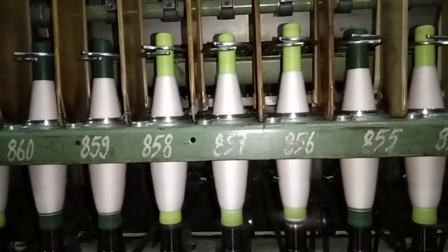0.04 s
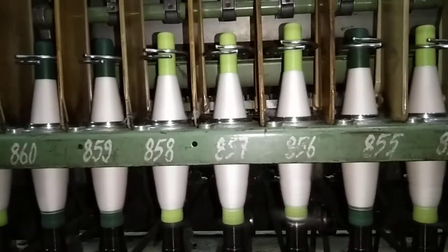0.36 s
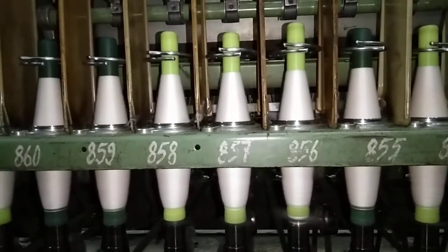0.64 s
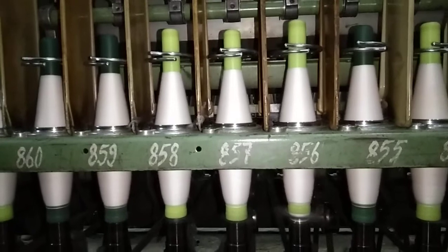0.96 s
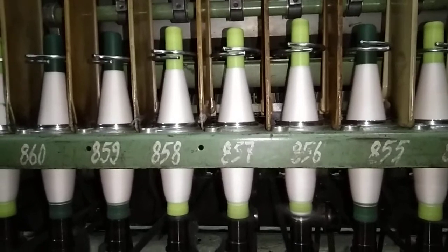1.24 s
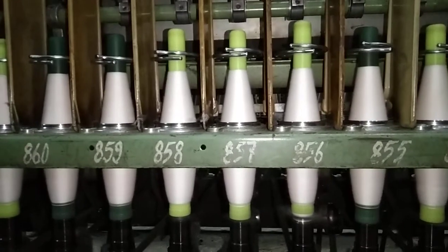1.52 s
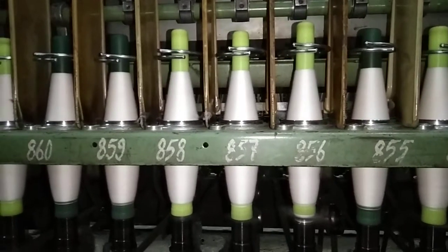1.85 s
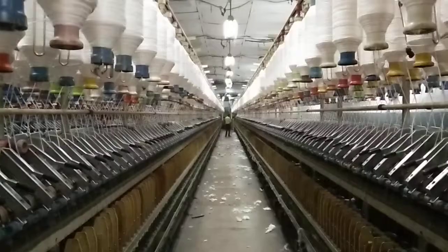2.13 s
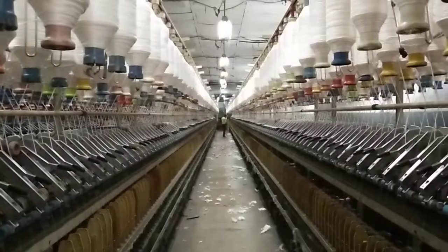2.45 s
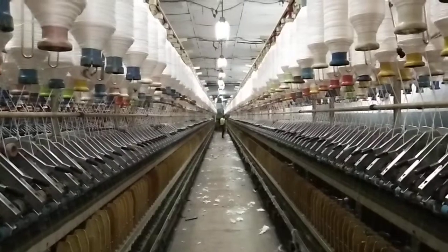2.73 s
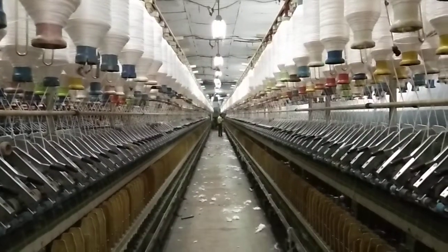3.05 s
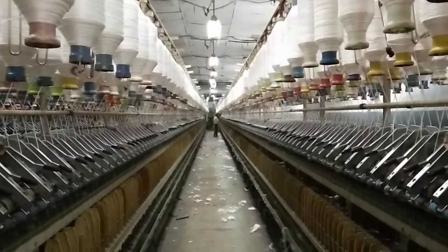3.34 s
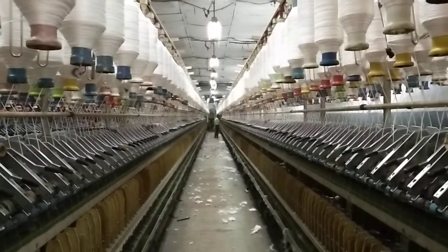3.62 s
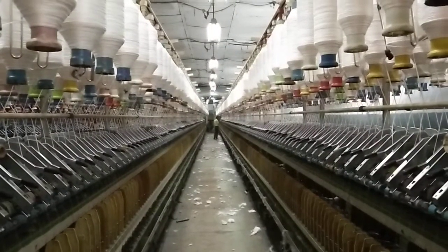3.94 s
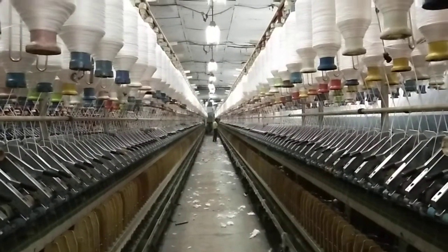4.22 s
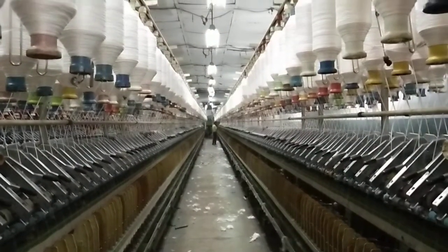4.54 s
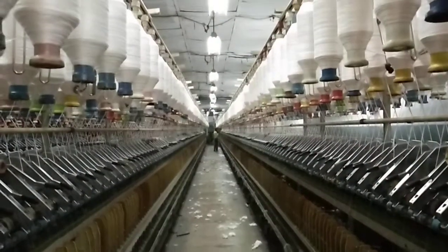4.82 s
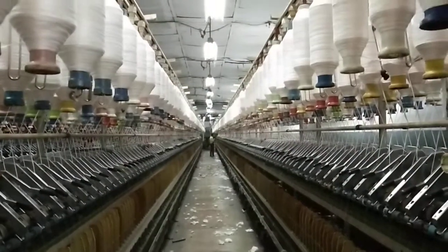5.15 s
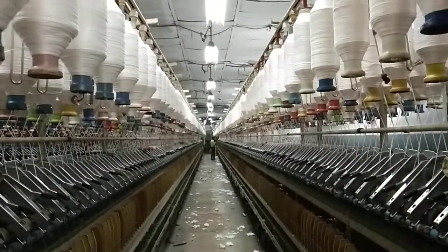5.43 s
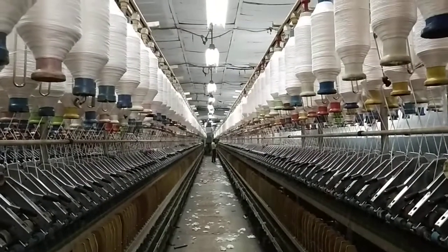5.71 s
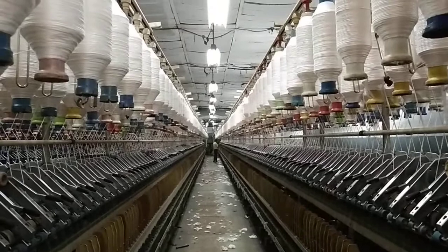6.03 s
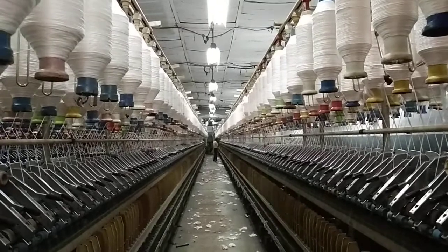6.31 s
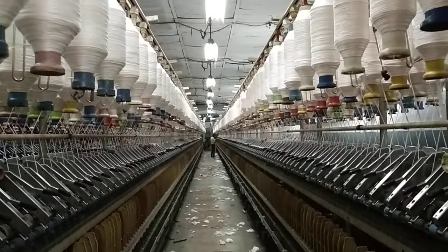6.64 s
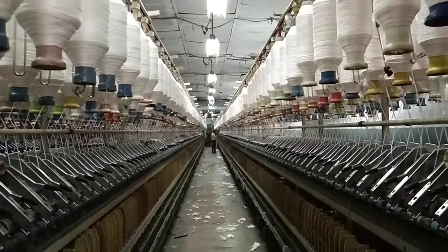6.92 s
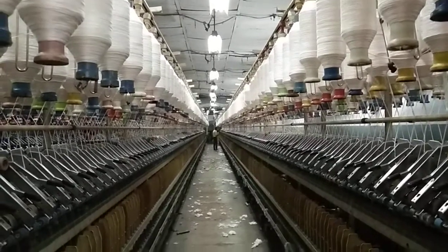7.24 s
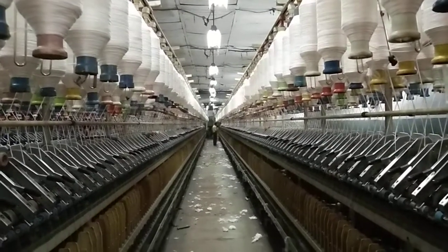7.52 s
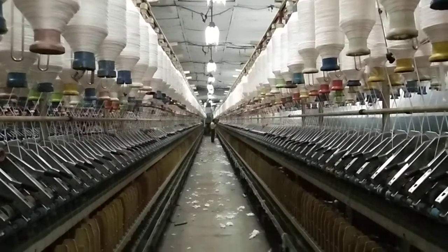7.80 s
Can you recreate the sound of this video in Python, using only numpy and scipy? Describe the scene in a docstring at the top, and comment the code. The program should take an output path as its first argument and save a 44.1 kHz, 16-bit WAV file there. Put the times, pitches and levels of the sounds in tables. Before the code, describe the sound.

A constant bright hiss sits on top of a humming roar as rows of spinning frames work in a big factory hall. It is first heard close to the spindles, then, after a very short silent gap, from the aisle between the machines, where the most prominent hum is a little lower. Spindles, pulleys and fans drone with a slight waver, and the bass swells gently now and then.

```python
"""A bright, steady hiss over a humming roar: ring spinning frames running in a large mill hall.
Thousands of travellers rub round their steel rings and merge into the hiss; whirling bobbins and
drive belts churn the air into the roar, and spindles, pulleys and a suction fan hum inside it.
We stand beside one row of spindles, then, after a short silence, down the aisle. Both ears hear the same."""
import sys
import numpy as np
from scipy import signal
from scipy.fft import rfft, irfft, next_fast_len
from scipy.io import wavfile

SR = 44100
rng = np.random.default_rng(int(sys.argv[2]) if len(sys.argv) > 2 else 0)


def transcribe(u):
    """Save the signal u as a 16-bit wav file named by the first command-line argument.

    u: samples, shape (n,) or (channels, n), limited to [-1, 1]; the rate is SR.
    q: integer samples, one column per channel.
    """
    v = np.clip(np.atleast_2d(u).T, -1, 1)
    q = np.round(v * 32767).astype(np.int16)
    wavfile.write(sys.argv[1], SR, q)


N = 351477
TIME = np.arange(N) / SR
SIZE = next_fast_len(N)
FREQS = np.maximum(np.arange(SIZE // 2 + 1) * SR / SIZE, 1)
CLOSE, AISLE = 0, 1   # the two listening places


def from_db(db):
    """Decibels to gain."""
    return 10 ** (np.asarray(db) / 20)


def filtered(x, gain):
    """Apply a gain given at every frequency."""
    return irfft(rfft(x, SIZE) * gain, SIZE)[:N]


def coloured(noise, spectrum, place):
    """Give white noise the tone colour heard at one place."""
    hz, *levels_db = np.transpose(spectrum)
    db = np.interp(np.log(FREQS), np.log(hz), levels_db[place])
    return filtered(noise, from_db(db) * np.sqrt(SR / 2))


def low_pass(edge_hz, order):
    """Gain curve that rolls off above the edge."""
    return 1 / np.sqrt(1 + (FREQS / edge_hz) ** (2 * order))


def high_pass(edge_hz, order):
    """Gain curve that rolls off below the edge."""
    return 1 / np.sqrt(1 + (edge_hz / FREQS) ** (2 * order))


def drift(rate_hz):
    """A smooth random wander with spread 1."""
    step, run_in = 100, 2000
    pole = np.exp(-2 * np.pi * rate_hz * step / SR)
    noise = rng.standard_normal(N // step + run_in + 2)
    slow = signal.lfilter([1], [1, -2 * pole, pole * pole], noise)[run_in:]
    return np.interp(np.arange(N) / step, np.arange(len(slow)), (slow - slow.mean()) / slow.std())


def bump(peak_s, width_s):
    """A smooth rise and fall of height 1."""
    return np.exp(-.5 * ((TIME - peak_s) / width_s) ** 2)


def ride_bands(x, edge_hz, low_db=0, high_db=0):
    """Ride the levels below and above a crossover separately."""
    low = filtered(x, low_pass(edge_hz, order=4) ** 2)
    return low * from_db(low_db) + (x - low) * from_db(high_db)


def turning(hz, slip_hz, slip_rate_hz):
    """A sine of rms 1 whose speed wanders as its belt slips."""
    turns = np.cumsum(hz + slip_hz * drift(slip_rate_hz)) / SR + rng.random()
    return np.sqrt(2) * np.sin(2 * np.pi * turns)


def frame_beat(crest_s=3.5, period_s=2.9):
    """Frames of nearly equal speed fall in and out of step; from -1 to 1."""
    return np.cos(2 * np.pi * (TIME - crest_s) / period_s)


def bass_swell(base_db=-0.5, beat_db=0.1, wander_db=0.5):
    """Bass level in dB: the slow beat of the frames, a few booms and a slight wander."""
    # brief booms in the hall's bass: peak_s, rise_db
    booms = [(0.35, 3), (1.38, 2), (3.32, 4.5), (5.9, 2.8), (6.7, 1.5), (7.6, 1.5)]
    boom_db = sum(rise_db * bump(peak_s, width_s=0.093) for peak_s, rise_db in booms)
    return base_db + beat_db * frame_beat() + boom_db + wander_db * drift(3)


def drive_roar(place):
    """Belts and whirling bobbins churn the air: a dull, even roar."""
    # spectrum of belts, frames and churned air: frequency_hz, close_db, aisle_db
    spectrum = [(20, -85, -79.5), (38, -76, -79), (60, -72, -71), (84.6, -67, -66), (120, -61, -56.5),
                (180, -58, -57), (215, -60, -59), (279, -55, -58), (320, -60, -61), (450, -61, -60),
                (620, -57, -57), (870, -57, -57), (1065, -57.5, -59), (1334, -61, -58)]
    top_hz = spectrum[-1][0]
    roar = coloured(rng.standard_normal(N), spectrum, place)
    return filtered(roar, low_pass(top_hz, order=8) * high_pass(15, order=2))


def rotor_hum(beat_db=1.5, spindle_lift_db=0.4, spindle_beat_db=1.2):
    """Each unbalanced part hums at its own speed and beats with its like; one mix for each place."""
    # motor, pulleys, spindles near 190 Hz and their octave, fans: pitch_hz, close_db, aisle_db
    rotors = [(49.3, -60, -73), (76.5, -52, -52), (99.2, -52, -59), (122.6, -47.5, -51.5),
              (127.8, -54.5, -44.5), (149, -45.5, -63), (154, -67, -48), (185.5, -44.5, -48),
              (191.2, -43.5, -43.5), (199.5, -44, -54.5), (229, -57, -47), (246, -57.5, -67),
              (287.4, -48.5, -63), (379.3, -49, -46), (386, -50, -65), (695, -62, -42), (862, -40.5, -63)]
    close, aisle = 0, 0
    for pitch_hz, close_db, aisle_db in rotors:
        # the high hums come from many like parts and blur
        slip_hz, slip_rate_hz = (4.5, 6) if pitch_hz > 500 else (0.774, 1.2)
        hum = turning(pitch_hz, slip_hz, slip_rate_hz) * from_db(beat_db * drift(1.2))
        hum /= hum.std()
        if 170 < pitch_hz < 210:   # spindles of neighbouring frames beat most deeply
            hum *= from_db(spindle_lift_db + spindle_beat_db * frame_beat())
        close += from_db(close_db) * hum
        aisle += from_db(aisle_db) * hum
    return close, aisle


def plate_reflections(hiss):
    """Short reflections ripple the spectrum of the nearest rings."""
    # bounces off the separator plates beside the spindles: delay_s, gain
    plates = [(.00119, 0.06), (.00137, -0.046), (.00161, -.06), (.003, 0.048), (.0053, .04), (.01, .04)]
    return hiss + sum(gain * np.interp(TIME - delay_s, TIME, hiss, left=0) for delay_s, gain in plates)


def hiss_swell(base_db=-0.12, wander_db=0.08):
    """Level of the upper hiss in dB: nearly even, breathing a little."""
    # gentle swells of the hiss: peak_s, rise_db, width_s
    swells = [(1.0, 0.5, .15), (1.5, .3, .15), (2.15, 0.3, .12), (2.9, 0.1, .15), (7.05, 0.3, .2),
              (7.9, .5, .25)]
    swell_db = sum(rise_db * bump(peak_s, width_s) for peak_s, rise_db, width_s in swells)
    return base_db + swell_db + wander_db * drift(2)


def traveller_hiss(place, flutter_db, unrest_db):
    """Countless tiny slips on the rings fuse to a hiss; a wobbling yarn balloon varies the rubbing."""
    # travellers on steel rings, ringing broadly near 2 and 5.5 kHz: frequency_hz, close_db, aisle_db
    spectrum = [(1344, -56.5, -60), (1680, -55, -54.5), (1960, -52.5, -53), (2516, -56.5, -57.5),
                (3000, -60.5, -62), (3910, -61, -60.5), (4860, -54.5, -56), (5590, -53.5, -54.5),
                (6660, -58, -59.0), (7400, -59, -60.5), (8970, -76, -77), (12260, -84.5, -85.5),
                (15400, -74, -76.5)]
    bottom_hz = spectrum[0][0]
    balloon = turning(hz=14.2, slip_hz=2.1, slip_rate_hz=2.5)
    force_db = flutter_db * balloon + unrest_db * drift(4.7)
    friction = rng.standard_normal(N) * from_db(force_db)
    return filtered(coloured(friction, spectrum, place), high_pass(bottom_hz, order=8))


def scene(close_ends_s=2.0013, aisle_starts_s=2.1036):
    """The same machines from two places, with silence between."""
    is_close, is_aisle = TIME < close_ends_s, TIME >= aisle_starts_s
    close_hum, aisle_hum = rotor_hum()
    roar = np.where(is_close, drive_roar(CLOSE) + close_hum, drive_roar(AISLE) + aisle_hum)
    roar = ride_bands(roar, edge_hz=236, low_db=bass_swell())
    close_hiss = plate_reflections(traveller_hiss(CLOSE, flutter_db=0.17, unrest_db=0.26))
    aisle_hiss = traveller_hiss(AISLE, flutter_db=0.11, unrest_db=0.25)
    hiss = np.where(is_close, close_hiss, aisle_hiss)
    hiss = ride_bands(hiss, edge_hz=2760, high_db=hiss_swell())
    mill = (roar + hiss) * (is_close | is_aisle)
    return np.tile(mill, (2, 1))


def record(dry):
    """A steep low-pass takes the very top off the hiss."""
    cutoff_hz = 15520
    return signal.sosfilt(signal.ellip(12, .1, 90, cutoff_hz, fs=SR, output="sos"), dry)


dry = scene()
out = record(dry)
transcribe(out)
```